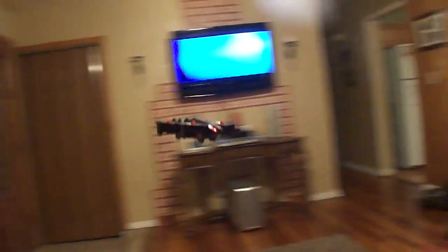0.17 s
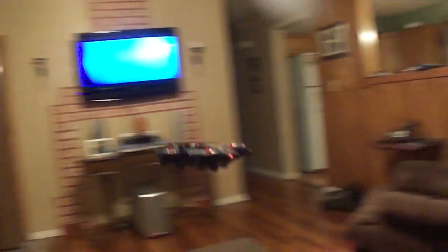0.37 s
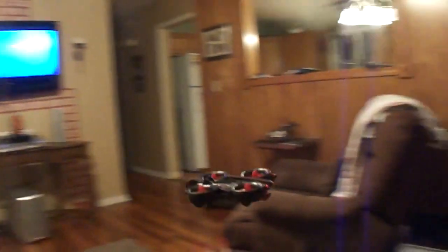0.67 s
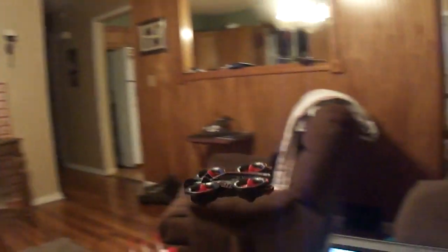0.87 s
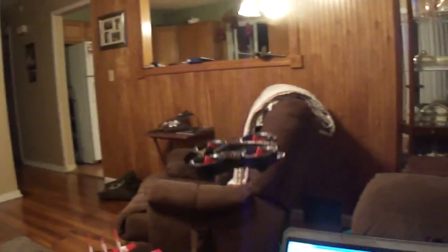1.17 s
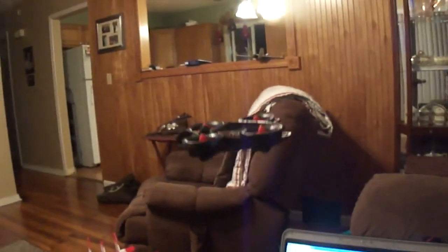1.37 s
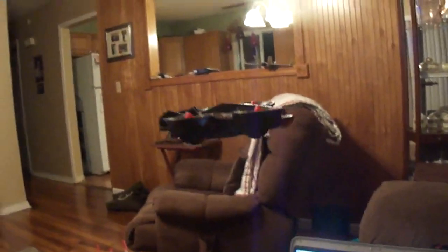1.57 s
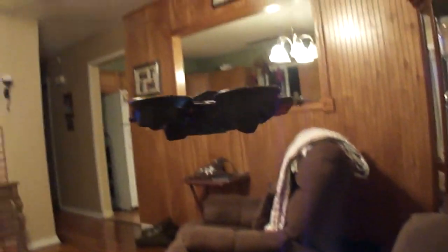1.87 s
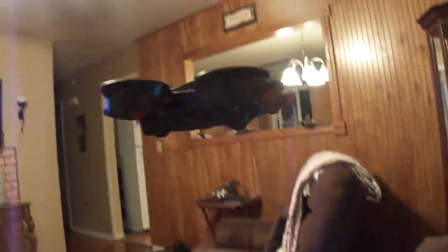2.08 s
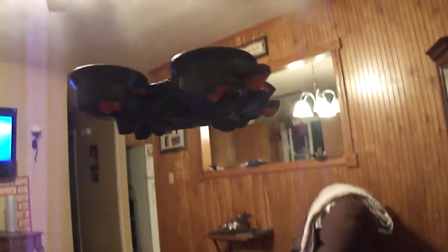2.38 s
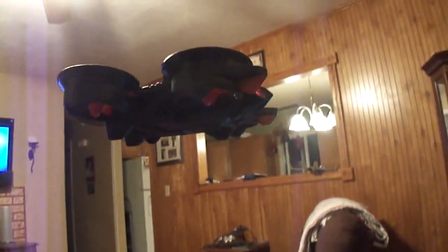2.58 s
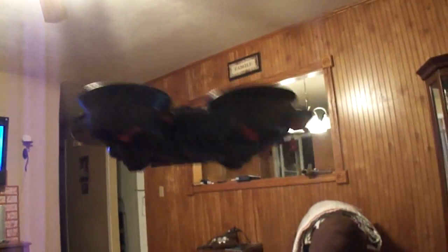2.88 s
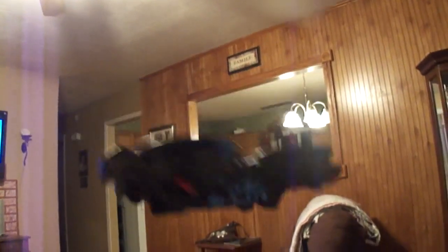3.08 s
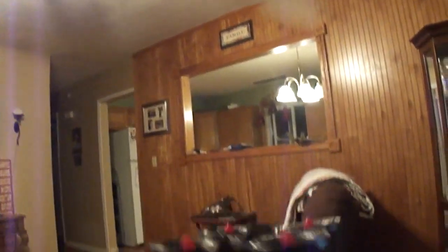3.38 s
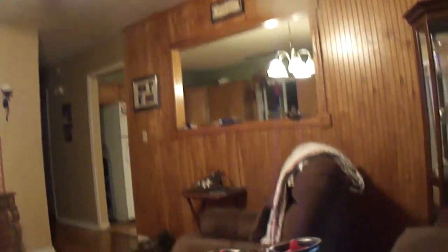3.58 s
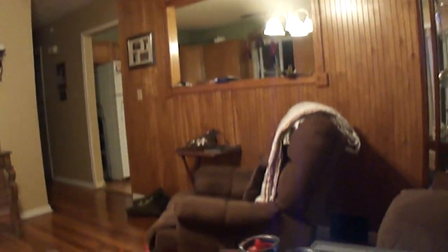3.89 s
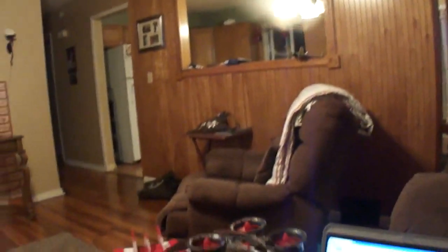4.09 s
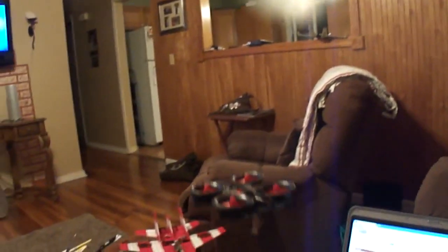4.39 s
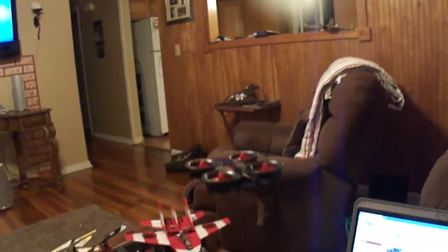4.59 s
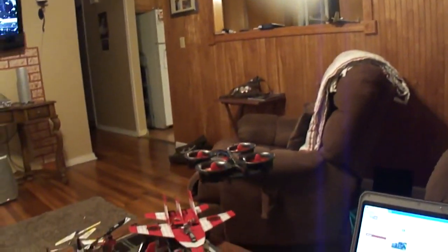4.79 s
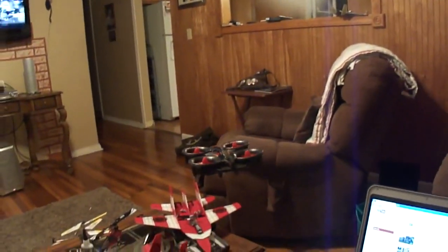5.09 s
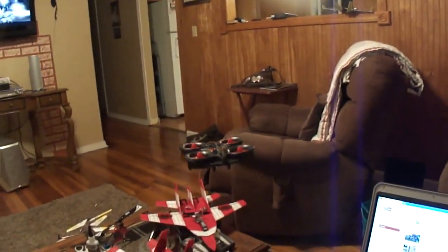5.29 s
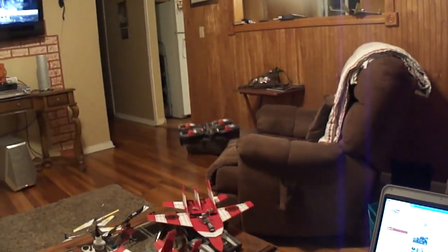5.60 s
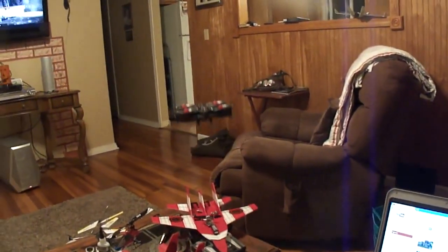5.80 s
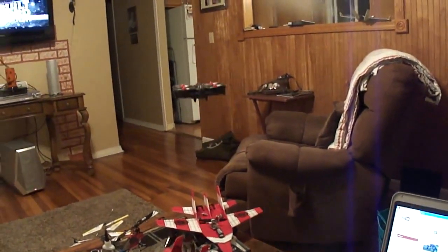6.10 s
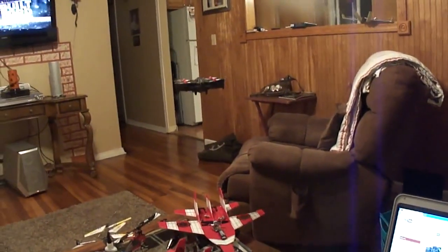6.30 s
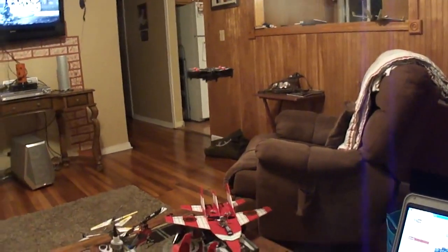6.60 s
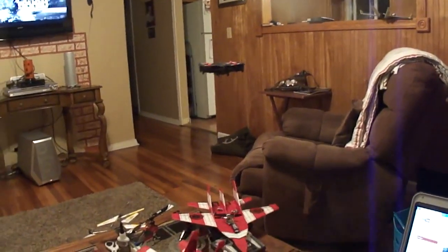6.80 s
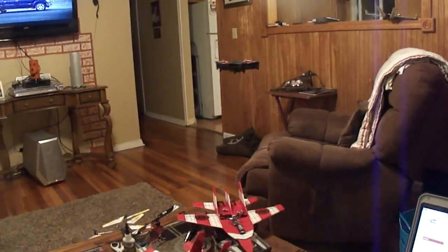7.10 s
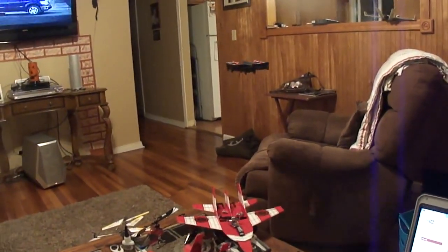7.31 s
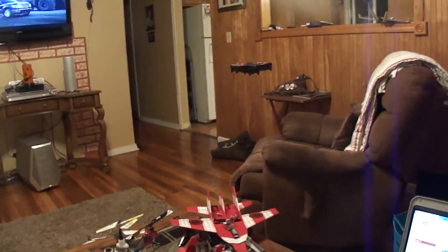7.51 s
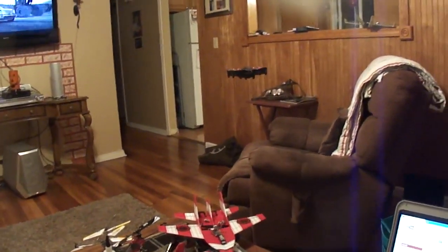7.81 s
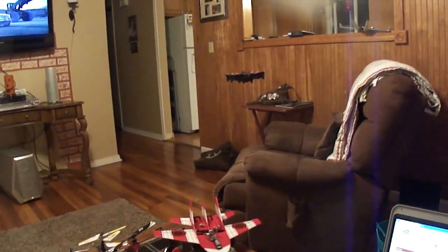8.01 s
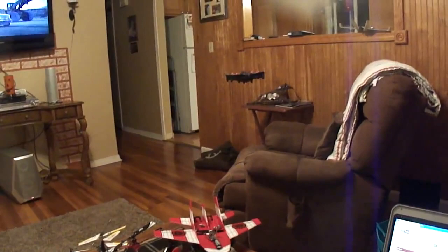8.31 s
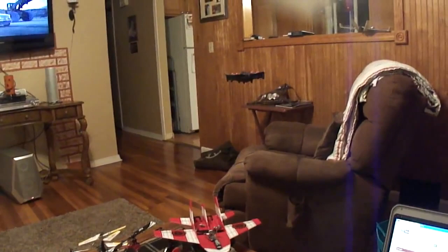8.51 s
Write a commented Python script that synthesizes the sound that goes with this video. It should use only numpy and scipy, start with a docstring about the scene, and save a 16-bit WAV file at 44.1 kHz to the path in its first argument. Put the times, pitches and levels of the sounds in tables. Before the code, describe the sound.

A small four-rotor drone flies around a living room with a continuous bright buzz, a hiss of rushing air and a thin, high motor whine. The propellers rise, fall and spread apart in pitch as it turns, sounding rougher, then settle into a steadier hover. Near the end the buzz and hiss suddenly get quieter. The room adds a short reverberation, and the microphone is nearly mono with thin bass.

```python
"""A furnished living room, where a small four-rotor drone with three-bladed ducted propellers hovers and turns.
Each rotor is a periodic source: it radiates a shaft tone, a strong blade tone and a rough harmonic buzz. In
turns the rotors part in speed. Their turbulent air wash hisses over a faint bass, and the motor switching
whines at a steady pitch. Near the end buzz and hiss drop at once and the shaft tones rise. The room adds a
short reverberation; the microphone has thin bass, and the two channels differ only faintly."""
import sys
import numpy as np
from scipy import signal
from scipy.fft import rfft, irfft
from scipy.io import wavfile

SR = 44100
rng = np.random.default_rng(int(sys.argv[2]) if len(sys.argv) > 2 else 0)


def file_out(sig):
    """Save sig as 16-bit WAV at sys.argv[1]."""
    # one column per channel
    cols = np.atleast_2d(sig).T
    # limit, then scale
    lim = np.clip(cols, -1, 1)
    pcm = np.round(lim * 32767).astype(np.int16)
    wavfile.write(sys.argv[1], SR, pcm)


N = 381465
BLADES, HOVER_HZ = 3, 335

# shaft speed, one curve a rotor: (time [s], speed [Hz])
SHAFT_SPEEDS = [
    [(0, 345.5), (.2, 334), (.5, 339.5), (.64, 367.5), (.86, 364.6), (.97, 378), (1.12, 373.3), (1.28, 345),
     (1.44, 343.3), (1.76, 350.5), (2.08, 339.6), (2.26, 344.2), (2.45, 344), (2.62, 342.6), (2.72, 376),
     (2.93, 402.8), (3.1, 367.2), (3.3, 361.5), (3.87, 377.3), (4.0, 377.3), (4.08, 393.8), (4.19, 374.3),
     (4.25, 359.6), (4.35, 365.7), (4.4, 387), (5.2, 360.8), (5.44, 362.5), (6.08, 327.8), (6.4, 332.7),
     (7.4, 331.7), (7.68, 339.5), (7.84, 341), (8.32, 348.8), (8.65, 339.5)],
    [(0, 335.3), (.32, 352.7), (.55, 343.4), (.62, 360.3), (1.2, 362.1), (1.3, 349.3), (2.08, 334.5),
     (2.3, 337.4), (2.6, 336.6), (2.72, 365), (2.93, 395.5), (3.1, 364.5), (3.2, 370.3), (3.4, 360.8),
     (3.95, 364.2), (4.1, 372.5), (4.27, 358.2), (4.4, 370.3), (5.28, 351), (5.5, 361.7), (5.84, 351),
     (6.08, 334), (6.56, 334.5), (7.15, 333.2), (7.36, 334.4), (7.84, 332), (8.16, 337.4), (8.65, 335)],
    [(0, 311), (.48, 298.8), (.62, 337.5), (1.2, 324.1), (1.44, 332.6), (1.76, 334.4), (2.24, 329.1),
     (2.62, 325.8), (2.93, 277.4), (3.2, 308.2), (3.36, 303.9), (3.68, 301.8), (3.84, 319.8), (4.02, 349.5),
     (4.16, 314), (4.32, 335.4), (4.62, 308), (4.96, 314.2), (5.12, 323.3), (5.72, 345.7), (6.08, 322.6),
     (6.24, 323.5), (7.4, 324.2), (7.68, 324), (7.84, 330.7), (8.65, 325)],
    [(0, 292), (.42, 262.2), (.8, 303.8), (1.12, 327.2), (1.44, 341.2), (1.6, 331.3), (1.96, 308),
     (2.1, 305.9), (2.26, 307.1), (2.6, 308), (2.72, 265.4), (2.93, 217.3), (3.1, 263.3), (3.25, 284),
     (3.52, 271.4), (3.84, 296), (4.05, 352.8), (4.24, 340), (4.4, 300.3), (4.6, 270.5), (4.8, 288.1),
     (5.44, 328.6), (5.76, 336.6), (6.08, 323), (6.3, 325.8), (7.4, 329.5), (7.8, 317), (8.32, 318.4),
     (8.65, 320.7)],
]
# balance among the rotors: (time [s], faster pair's buzz [dB], slower pair's buzz [dB],
# slower pair's shaft tones [dB], second rotor's blade tone [dB], treble of the buzz [dB])
ROTOR_BALANCE = [(0, -2.5, -13, -15, -7, 1), (.4, -7.5, -3.5, 7, -1, 7.5), (.66, -5, 1, -12, -20, 2),
                 (.8, -7, -3, 0, -20, 1), (.9, -3.5, -1, 1, -4, 4.5), (1.3, 1, -1, 7, 7, -3),
                 (1.8, -1, 2, 10, 9.5, 1), (2.1, -4.5, -3, 7, 0, 7), (2.5, -6.5, -5, 13, 10.5, 6.5),
                 (2.8, -1, 2, -10.5, 3.5, -1), (3.2, -4, 5.5, 11.5, 2, 7.5), (3.7, -0.5, -4, 10.5, 12, 3),
                 (3.92, -2, 0, 1, -4, 1), (4.1, 0, -3, 1, 0.5, -3), (4.45, -4, -1.5, 4.5, -1, 6),
                 (4.9, -4, -1, -0.5, 14.5, 7.5), (5.2, -4, 0, 3, -41, 4.5), (5.7, -0.5, 1.5, -10, 2, 1),
                 (6.4, -3, -9.5, 10, -12, 0), (7.2, -4.5, -3, 8, -11, -1.5), (7.7, -1, -5.5, 9, -1.5, 3),
                 (8.65, -2.5, 2.5, -4, 15.5, 6.5)]
# response of ducts and frame to the buzz: (frequency [Hz], gain [dB])
FRAME_RESPONSE = [(1300, 0), (1900, -2), (2300, 0.5), (2700, 4), (3200, 3), (3600, 5), (4200, 2.5),
                  (4700, 3), (5200, 4.5), (5900, -5.5), (7000, -4), (8100, -0.5), (10000, -5)]


def rotors():
    """Superposition: four rotors, a faster and a slower pair, sum to shaft tones, blade tones and buzz."""
    speeds = np.vstack([in_time(curve) for curve in SHAFT_SPEEDS])
    turbulence = np.clip(np.sqrt(np.ptp(speeds, axis=0) / 70), .5, 1.4)   # calm in a hover, rough in turns
    *pair_buzz_db, slower_shaft_db, second_blade_fading_db, treble_db = in_time(ROTOR_BALANCE)
    shafts, blades, buzz = np.zeros((3, N))
    for rotor, speed in enumerate(speeds):
        pair = rotor // 2
        # a slowed rotor sinks into its own wake and runs rougher
        unrest = np.minimum(turbulence * (HOVER_HZ / speed) ** 1.6, 2)
        shaft_turns, blade_turns = rotation(speed, unrest)
        octaves_up = np.log2(speed / HOVER_HZ)
        shafts += shaft_tone(rotor, shaft_turns, slower_shaft_db * pair)
        # the second rotor's blade tone swells and fades against the first's
        blades += blade_tone(rotor, blade_turns, unrest, second_blade_fading_db * (rotor == 1))
        buzz += rotor_buzz(rotor, blade_turns, octaves_up, pair_buzz_db[pair])
        buzz += octave_tone(rotor, blade_turns, octaves_up)
    return shafts, blades, shelved(coloured(buzz, FRAME_RESPONSE), treble_db, above_hz=4400)


def rotation(speed, unrest):
    """Phase modulation: turbulence shifts each blade pass a little, which blurs the high harmonics."""
    wandering_hz = speed + 3 * unrest * drift(16)
    shaft_turns = np.cumsum(wandering_hz) / SR + rng.random()
    jitter_turns = .0105 * np.sqrt(unrest) * drift(79)
    return shaft_turns, shaft_turns + jitter_turns


# blade tones: (time [s], faster pair's level [dB], slower pair's level [dB])
BLADE_LEVELS = [(0, -19, -32), (.35, -26.5, -37), (.63, -25, -28), (.67, -14.5, -32), (.79, -15.5, -34),
                (.83, -23, -32), (.9, -17.5, -34), (1.04, -18.5, -39), (1.3, -30, -24), (1.9, -33, -30),
                (2.6, -37, -29.5), (2.7, -24, -26), (2.9, -27.5, -37.5), (3.2, -28, -27.5),
                (3.45, -23.5, -32.5), (3.75, -35, -24), (3.85, -24.5, -24), (3.96, -14, -22),
                (4.03, -22.5, -24), (4.1, -18, -30), (4.2, -24.5, -25), (4.32, -20, -29), (4.5, -20, -32),
                (4.8, -29.5, -36), (5.15, -17.5, -23.5), (5.5, -24.5, -26), (6, -29, -28.5),
                (6.85, -28.5, -32), (6.96, -17, -42), (7.06, -28, -39), (7.2, -23, -41), (7.28, -17.5, -31),
                (7.4, -23, -33), (8.65, -40.5, -32)]
BLADE_SHARE_DB = [-2.5, -6.5, -5, -4.5]   # rotors one to four


def blade_tone(rotor, turns, unrest, fading_db):
    """Blade-passing frequency: each blade pushes the air once a turn, three pressure cycles in all."""
    level_db = in_time(BLADE_LEVELS)[rotor // 2] + BLADE_SHARE_DB[rotor] + fading_db
    flutter_db = .18 * drift(1.2) + 2.3 * unrest * drift(22)
    return from_db(level_db + flutter_db) * tone(BLADES * turns)


# balance of the buzz as the craft tilts: (time [s], then for the faster and for the slower pair:
# overtones between blade harmonics [dB], blade harmonics 2 and 3 [dB], higher blade harmonics [dB])
BUZZ_BALANCE = [(0, -3, -6, 3.5, 0, -3, -5), (.3, -17, -2, 3, -4, 2, -10), (.6, 7, 0.5, 8, 4, -1.5, 4),
                (1, 3.5, -3, 2.5, 2.5, 0.032, -2), (1.4, -3.5, -5, 0.5, 4, -1.5, 4),
                (1.8, 2, -3, 3, 0.5, -1, 1.5), (2.1, 4, 2.5, 0, 5, 2.5, 3), (2.55, 2, -0.5, 2, 6, -1, 2.5),
                (2.75, 1.5, -4, -1, -3, 2, 4), (2.95, 2.5, -2.5, -1, -5, 0, 5), (3.2, -4, 2, -2, 1, 2, 1),
                (3.5, -2, -1.5, -5.5, 5, -1, 6), (3.85, -4, -2.5, -3, 5, -3, 6.5),
                (4.1, 3.5, -2, 8, 1, -5, 3), (4.3, 4.5, -0.5, -0.5, 0, -1, 7),
                (4.6, -1, -2, -4.5, 7, 2, 0.5), (5.1, 0.5, 0, -1, 2, -1, 1.5),
                (5.7, -2.5, -4, 1, 1.5, -0.5, 1), (6.1, -0.5, -1, 4.5, 3, 2.5, 5),
                (6.6, 0, -0.5, 9.5, -2, 0, 1), (7.1, -1.5, 1, 5, 6, 0, 8), (7.6, 0, -3, 2, -1, -5, 5),
                (8.1, 1.5, -2, 1, -3, 0, 3.5), (8.65, -5, -5, 0.5, -1, -0.5, -4)]
# second blade harmonic against the third: (time [s], gain [dB])
SECOND_HARMONIC = [(0, 7), (1, -0.5), (2, -1), (2.9, 3), (3.2, -3), (3.8, -2), (4.1, 0), (5.5, -0.5),
                   (6.2, 1), (7.5, 4), (8.65, 0)]
# the fifth blade harmonic swells as the craft comes close: (time [s], gain [dB])
FIFTH_HARMONIC = [(1.7, 0), (1.95, 4.5), (2.6, 5), (2.72, 0)]
BUZZ_SHARE_DB = [-9.5, -9.5, -14.5, -11]   # rotors one to four


def rotor_buzz(rotor, turns, octaves_up, facing_db, db_per_octave=11):
    """Harmonic series: one pressure wave repeats every turn, louder as the rotor runs faster."""
    between, low, high = from_db(in_time(BUZZ_BALANCE)).reshape(2, 3, N)[rotor // 2]
    gains = {"between": between, "third": low, "higher": high,
             "second": low * from_db(in_time(SECOND_HARMONIC)[0]),
             "fifth": high * from_db(in_time(FIFTH_HARMONIC)[0])}
    phase = np.linspace(0, 1, 2049)
    waves = one_turn(rotor, phase)
    pressure = sum(gains[group] * np.interp(turns % 1, phase, wave) for group, wave in waves.items())
    level_db = BUZZ_SHARE_DB[rotor] + facing_db + db_per_octave * octaves_up
    return from_db(level_db + 1.7 * drift(25)) * pressure


# line spectrum of the buzz: (frequency [multiples of shaft speed], relative level [dB])
BUZZ_SPECTRUM = [(4, -6.5), (5, -2), (6, 1), (7, -7.5), (8, -10.5), (9, -1), (10, -22), (11, -24.5),
                 (12, -9.5), (14, -23.5), (15, -11), (18, -12.5), (21, -17), (24, -20), (27, -22.5),
                 (30, -26)]
# brightness of the buzz, rotors one to four: (slope [dB per octave])
BUZZ_SLOPES = [-0.3, -2.5, -1.2, 1]


def one_turn(rotor, phase):
    """Fourier synthesis: the pressure over one turn, in five groups of overtones with a joint rms of 1."""
    blade_groups, waves = {6: "second", 9: "third", 15: "fifth"}, {}
    for multiple, db in BUZZ_SPECTRUM:
        group = "between" if multiple % BLADES else blade_groups.get(multiple, "higher")
        gain = from_db(db + BUZZ_SLOPES[rotor] * np.log2(multiple / 9))
        waves[group] = waves.get(group, 0) + gain * tone(multiple * phase + rng.random())
    rms = np.sqrt(np.mean(sum(waves.values()) ** 2))
    return {group: wave / rms for group, wave in waves.items()}


# all shaft tones together: (time [s], level [dB])
SHAFT_LEVEL = [(0.0, -33), (0.29, -44), (0.72, -29.5), (0.79, -33.5), (1.25, -32.5), (1.33, -36.5),
               (2.58, -37.5), (2.74, -29.5), (3.16, -40.5), (3.25, -58), (3.39, -41), (3.56, -47.5),
               (3.9, -33), (4.21, -27), (4.34, -40.5), (5.85, -32.5), (6.04, -45.5), (6.4, -46),
               (6.72, -49.5), (6.89, -39), (7.2, -46), (7.35, -39.5), (7.49, -54), (7.56, -45), (8.07, -47),
               (8.13, -36.5), (8.65, -33.5)]
SHAFT_SHARE_DB = [2.5, -5, -25.5, -9]   # rotors one to four


def shaft_tone(rotor, turns, facing_db):
    """Rotational fundamental: one pressure cycle for each turn of the shaft."""
    level_db = in_time(SHAFT_LEVEL)[0] + SHAFT_SHARE_DB[rotor] + facing_db
    return from_db(level_db + 2.2 * drift(19)) * tone(turns)


# all tones at twice the shaft speed: (time [s], gain [dB])
OCTAVE_GAIN = [(0, -1), (.6, -2.5), (1.2, 2), (2, -2), (2.8, 1.5), (3.6, 2.5), (4.3, -3.5), (5, 4.5),
               (5.8, -1), (6.3, -5), (6.9, -10), (7.2, 4.5), (7.6, -7), (8.1, -7), (8.65, 3)]
# those tones, rotors one to four: (level relative to the buzz [dB])
OCTAVE_SHARE_DB = [-26.5, -31, -29.5, -29]


def octave_tone(rotor, turns, octaves_up, db_per_octave=28):
    """Second shaft harmonic: two cycles a turn, growing steeply with rotor speed."""
    level_db = OCTAVE_SHARE_DB[rotor] + in_time(OCTAVE_GAIN)[0] + db_per_octave * octaves_up
    return from_db(level_db + 4.5 * drift(13)) * tone(2 * turns)


# spectrum of the air wash: (frequency [Hz], relative spectral density [dB])
WASH_SPECTRUM = [(40, -35), (130, -43), (270, -15.5), (480, -15), (800, -11), (1050, 0.5), (1500, -2.5),
                 (2500, -10.5), (3300, -9), (4500, -18.5), (5700, -12.5), (6600, -24.5), (7600, -22.5),
                 (9300, -27.5), (10200, -27.5), (11000, -41)]
# lower band of the wash, calmer in the hover: (time [s], gain [dB])
WASH_GUSTS = [(0, 0.5), (1, -1), (1.5, -1), (2.5, -1.5), (2.9, -0.5), (3.7, -0.5), (4.1, -0.5), (4.6, 0.5),
              (5.7, -2), (6.2, -2), (7.5, -2), (8.1, 0.5), (8.14, 0), (8.65, 0.5)]
# steady resonances, probably of ducts and frame, and a narrow hiss round the switching whine:
# (centre [Hz], bandwidth of one filter pass [Hz], level [dB])
WASH_RESONANCES = [(1209, 81, -16), (5685, 117, -21), (9290, 305, -29.5)]


def air_wash():
    """Turbulent jet noise: a broad hiss from the air jets, with narrow resonant bands."""
    gust_db, = in_time(WASH_GUSTS)
    jets = rms_one(coloured(rng.standard_normal(N), WASH_SPECTRUM))
    hiss = from_db(gust_db - 5) * shelved(jets, -gust_db, above_hz=3440)   # the treble stays steady
    for centre_hz, width_hz, db in WASH_RESONANCES:
        b, a = signal.iirpeak(centre_hz, centre_hz / width_hz, fs=SR)
        band = signal.lfilter(b, a, rng.standard_normal(N))
        hiss += from_db(db) * rms_one(signal.lfilter(b, a, band))
    return hiss


# motor drivers: (switching frequency [Hz], relative level [dB])
MOTOR_DRIVERS = [(5703, -1), (5712, -11), (5693, -13)]
# switching whine: (time [s], level [dB])
WHINE_LEVEL = [(0, -52), (.38, -34), (.6, -43), (.7, -41), (.9, -38), (1.2, -38.5), (1.3, -32), (1.5, -49),
               (1.66, -44), (1.78, -34), (2.3, -34), (2.62, -34), (2.7, -36), (2.78, -31.5), (3.14, -35),
               (3.25, -47), (3.42, -32), (3.56, -47), (4.1, -35), (4.4, -41.5), (4.65, -35), (4.95, -48),
               (5.4, -37), (5.9, -33.5), (6.07, -29.5), (6.28, -33), (6.4, -42), (6.6, -33.5),
               (7.15, -35.5), (7.3, -45), (7.8, -36), (8.1, -45), (8.65, -37)]


def switching_whine(wander_hz=5.5, flutter_db=2):
    """Beating: the motor drivers switch at nearly the same rate; one leads, the others beat against it."""
    whine = np.zeros(N)
    for hz, db in MOTOR_DRIVERS:
        cycles = np.cumsum(hz + wander_hz * drift(10.65)) / SR + rng.random()
        whine += from_db(db) * tone(cycles)
    return from_db(in_time(WHINE_LEVEL)[0] + flutter_db * drift(63)) * whine


# faint bass: (time [s], level [dB])
DRAUGHT_LEVEL = [(0, -53), (1, -57.5), (1.8, -55), (2.3, -61), (3, -72), (3.9, -58), (4.6, -68), (5.2, -56),
                 (5.7, -66), (6.1, -50.5), (6.9, -55), (7.6, -51.5), (8.65, -56)]


def draught(flutter_db=5):
    """Amplitude-modulated noise: a lumpy bass, probably the draught of the rotors on the microphone."""
    bass_band = signal.butter(2, [70, 190], "band", fs=SR, output="sos")
    bass = rms_one(signal.sosfilt(bass_band, rng.standard_normal(N)))
    return from_db(in_time(DRAUGHT_LEVEL)[0] + flutter_db * drift(10.6)) * bass


def room(x, echo_db, t60_s=.5, gap_s=.006):
    """Reverberation: after the direct sound and a short gap, a diffuse field decays exponentially."""
    age = np.arange(round(t60_s * SR)) / SR
    echo = rng.standard_normal(len(age)) * from_db(-60 * age / t60_s) * (age > gap_s)
    echo /= np.sqrt(np.sum(echo ** 2))
    return x + from_db(echo_db) * signal.fftconvolve(x, echo)[:N]


def from_db(db):
    """Amplitude ratio of a level in decibels."""
    return 10 ** (np.asarray(db) / 20)


def rms_one(x):
    """Normalisation to unit rms."""
    return x / np.sqrt(np.mean(x ** 2) + 1e-20)


def in_time(rows):
    """Linear interpolation of a table's columns over time, one value a sample."""
    times, *columns = np.transpose(rows)
    return np.array([np.interp(np.arange(N) / SR, times, column) for column in columns])


def drift(rate_hz):
    """Random fluctuation of rms 1: coarsely sampled noise through two one-pole low-passes."""
    step, settling = 20, 4000
    pole = np.exp(-2 * np.pi * rate_hz * step / SR)
    noise = rng.standard_normal(N // step + settling + 2)
    slow = signal.lfilter([1], [1, -2 * pole, pole * pole], noise)[settling:]
    return np.interp(np.arange(N) / step, np.arange(len(slow)), rms_one(slow))


def tone(cycles):
    """Simple harmonic motion of rms 1, from a count of cycles."""
    return np.sqrt(2) * np.sin(2 * np.pi * cycles)


def coloured(x, response):
    """Spectral shaping by a curve of (frequency [Hz], gain [dB])."""
    hz, db = np.transpose(response)
    bins_hz = np.fft.rfftfreq(N, 1 / SR) + 1
    gain = from_db(np.interp(np.log(bins_hz), np.log(hz), db))
    return irfft(rfft(x) * gain, N)


def shelved(x, db, above_hz):
    """Shelving filter: the treble is raised or lowered by db."""
    treble = signal.sosfiltfilt(signal.butter(3, above_hz, "high", fs=SR, output="sos"), x)
    return x + (from_db(db) - 1) * treble


# buzz and wash together; the treble follows the way the craft faces: (time [s], level [dB], treble [dB])
AIR_LEVELS = [(0, -20.5, 2), (.5, -21, 5.5), (.67, -21.5, 1), (1.3, -22.5, 3.5), (2.1, -21, 5),
              (2.6, -20.5, 5.5), (2.8, -23, 6.5), (3.2, -23.5, 5.5), (3.7, -21, 3.5), (4.2, -22, 1.5),
              (4.45, -24, 3.5), (4.85, -22, 2), (5.7, -22.5, 4.5), (6.45, -22.5, 7), (7, -21.5, 4),
              (7.5, -22, 3), (8.1, -24, 4), (8.12, -28.5, 3.5), (8.65, -26.5, 2)]
# left-right difference: (frequency [Hz], level against the middle [dB])
SIDE_SPECTRUM = [(100, -20), (250, -42), (1000, -62.5), (2000, -74), (4000, -47), (8000, -33)]


def scene():
    """Superposition of drone and room; a faint side signal makes the two channels differ by a trace."""
    air_db, treble_db = in_time(AIR_LEVELS)
    shafts, blades, buzz = rotors()
    air = shelved(room(buzz + air_wash(), echo_db=-7.5), treble_db, above_hz=7900)
    tones = room(shafts + blades, echo_db=-14) + switching_whine()
    middle = from_db(air_db) * air + tones + draught()
    side = coloured(np.roll(middle, SR // 9), SIDE_SPECTRUM)
    return np.array([middle + side, middle - side])


def record(dry):
    """Band limiting: a small microphone thins the bass, and the top is cut steeply."""
    bass_hz, cutoff_hz = 308, 11040
    thin = signal.sosfilt(signal.butter(2, bass_hz, "high", fs=SR, output="sos"), dry)
    return signal.sosfilt(signal.ellip(12, .3, 70, cutoff_hz, fs=SR, output="sos"), thin)


dry = scene()
out = record(dry)
file_out(out)
```